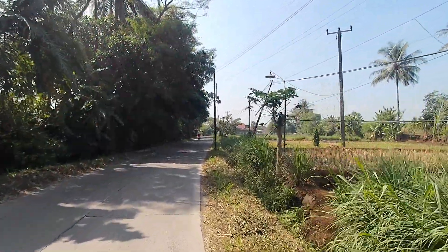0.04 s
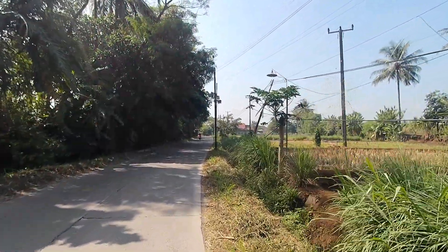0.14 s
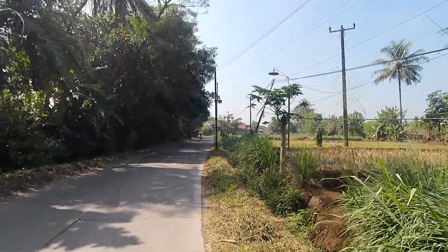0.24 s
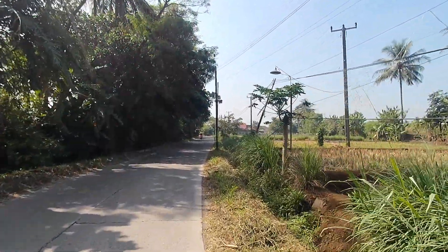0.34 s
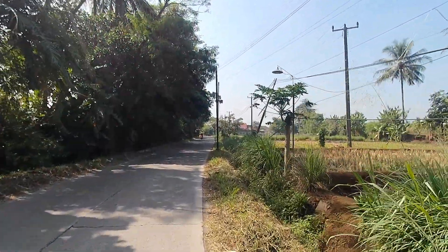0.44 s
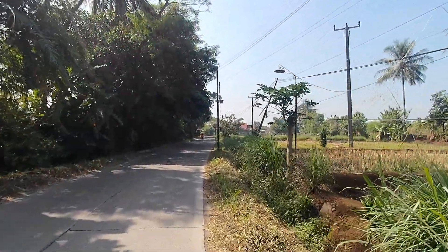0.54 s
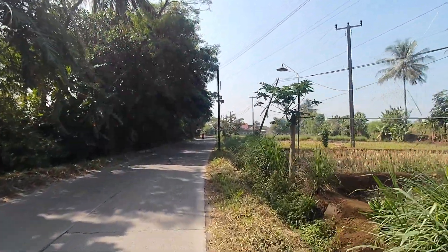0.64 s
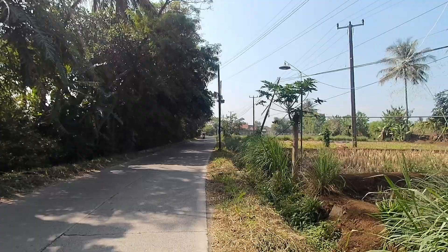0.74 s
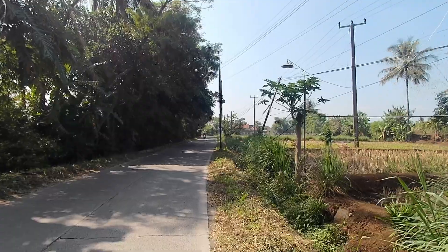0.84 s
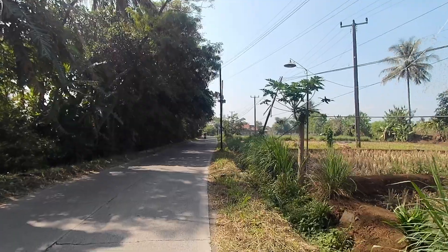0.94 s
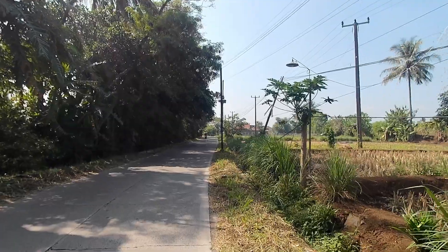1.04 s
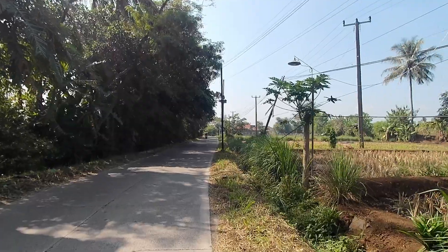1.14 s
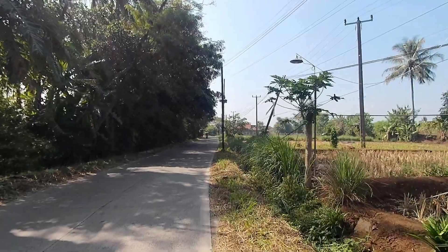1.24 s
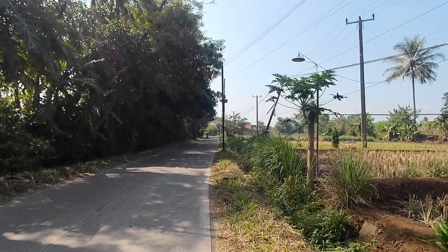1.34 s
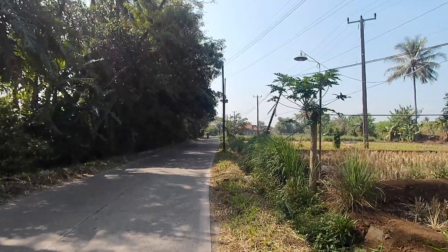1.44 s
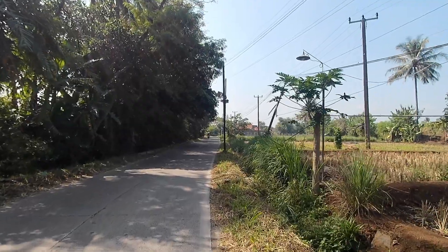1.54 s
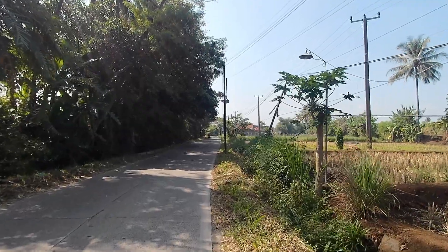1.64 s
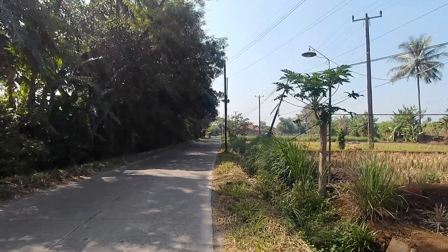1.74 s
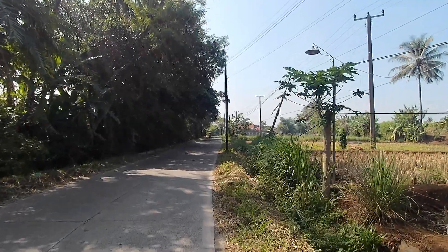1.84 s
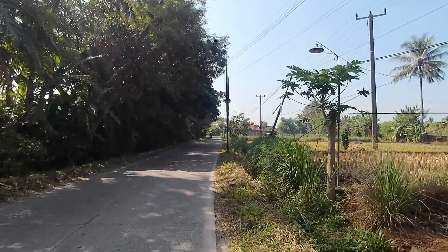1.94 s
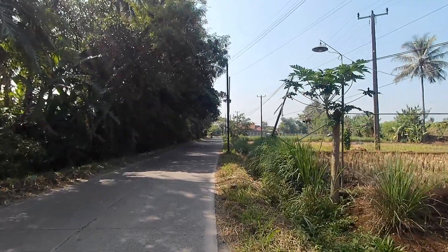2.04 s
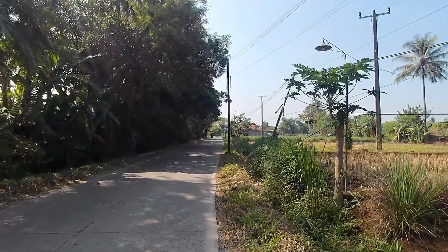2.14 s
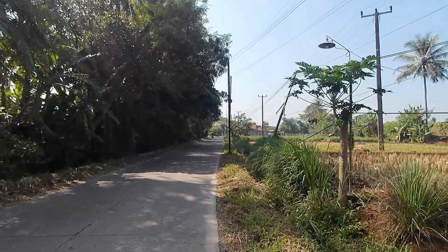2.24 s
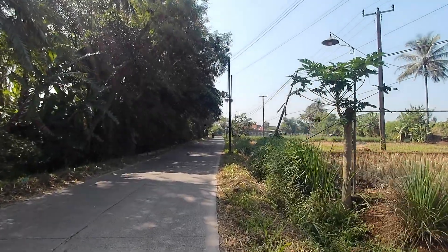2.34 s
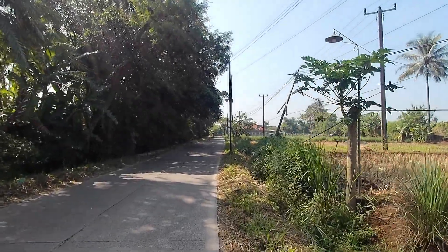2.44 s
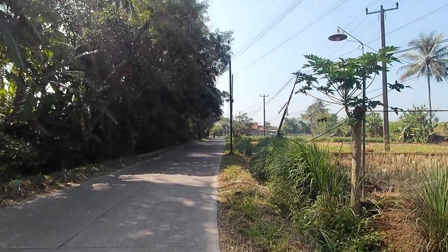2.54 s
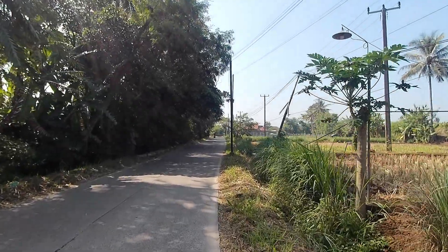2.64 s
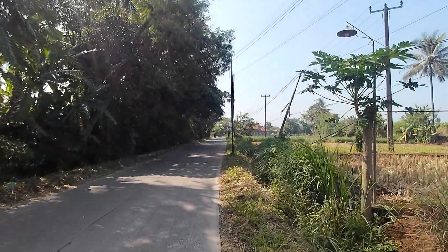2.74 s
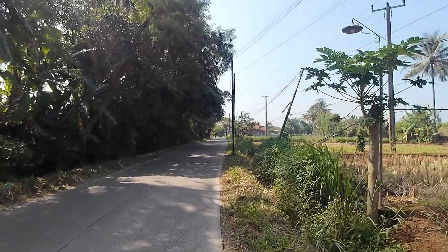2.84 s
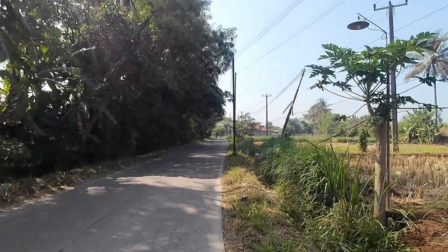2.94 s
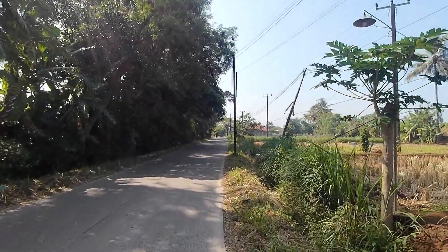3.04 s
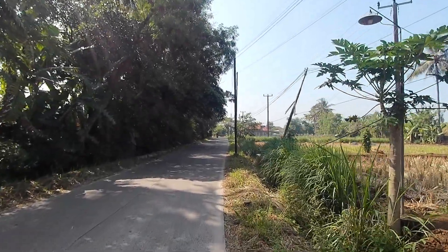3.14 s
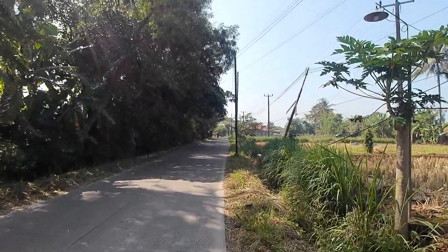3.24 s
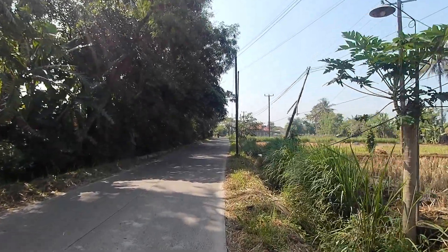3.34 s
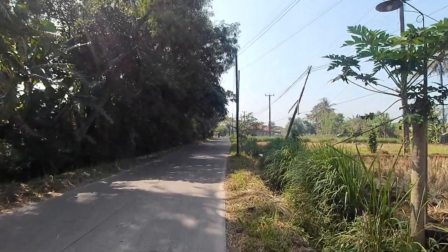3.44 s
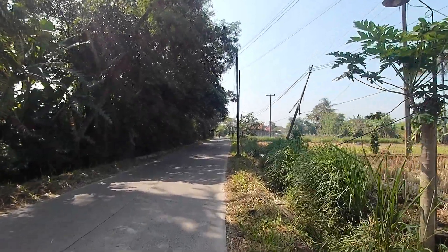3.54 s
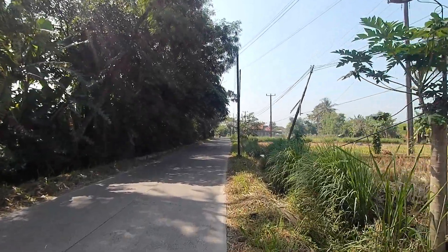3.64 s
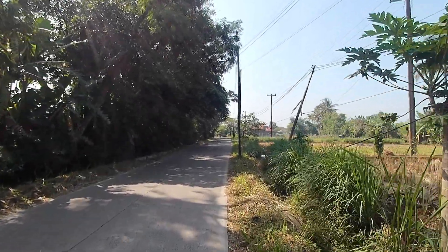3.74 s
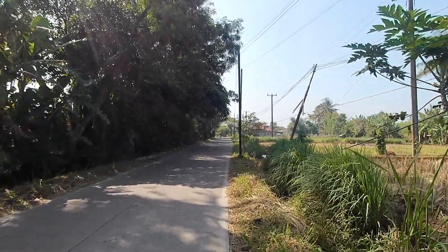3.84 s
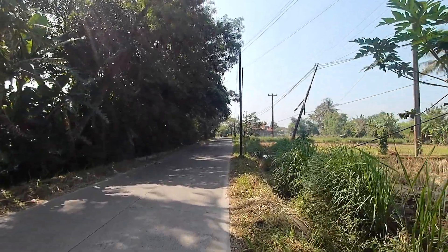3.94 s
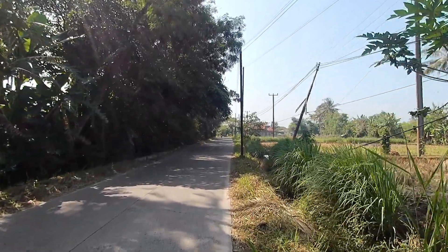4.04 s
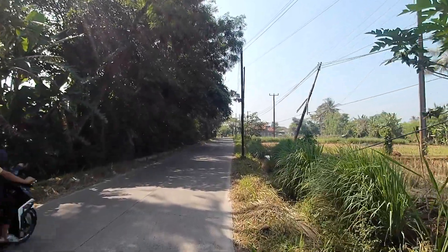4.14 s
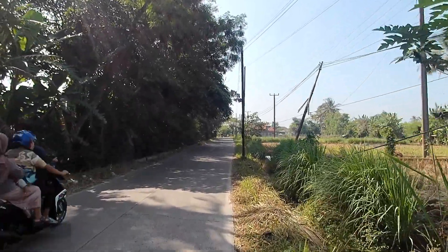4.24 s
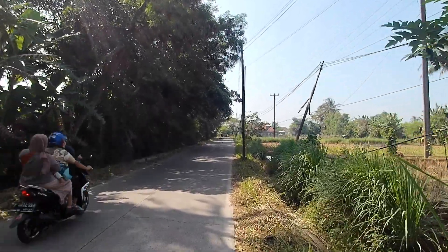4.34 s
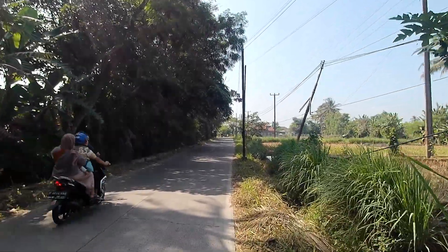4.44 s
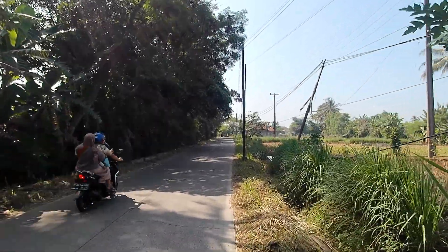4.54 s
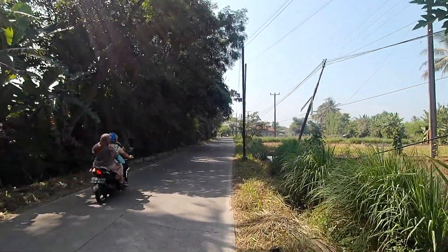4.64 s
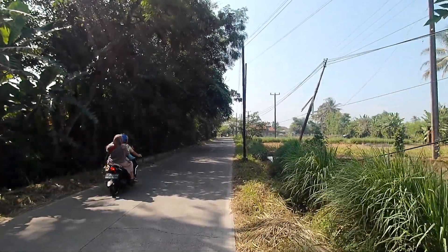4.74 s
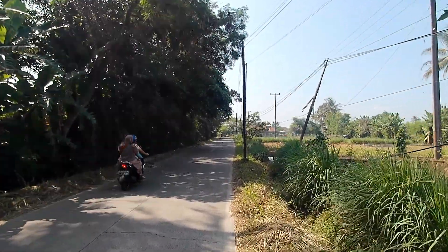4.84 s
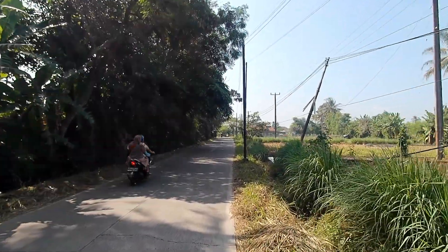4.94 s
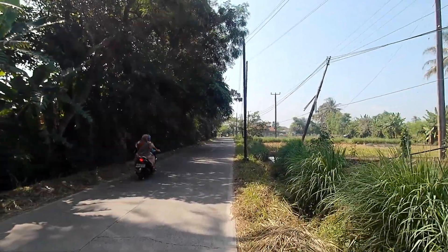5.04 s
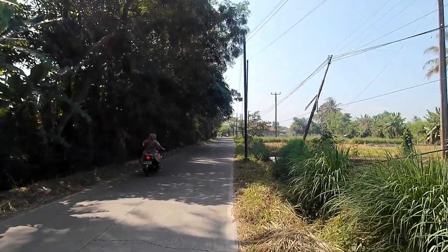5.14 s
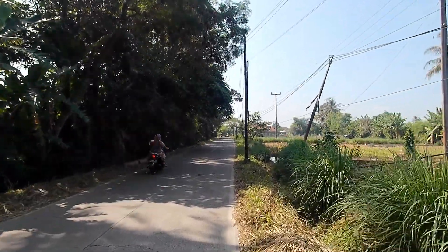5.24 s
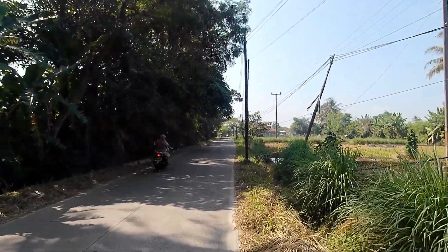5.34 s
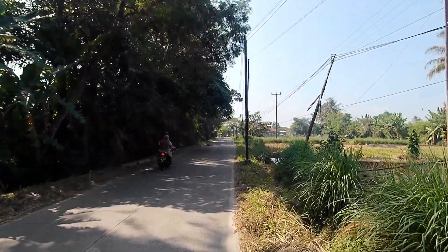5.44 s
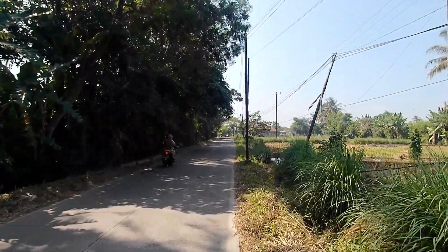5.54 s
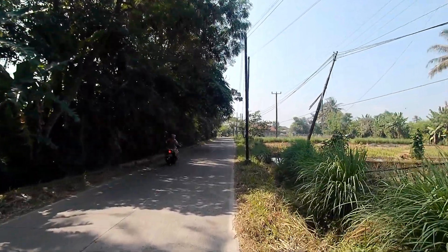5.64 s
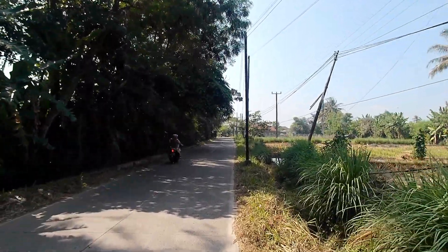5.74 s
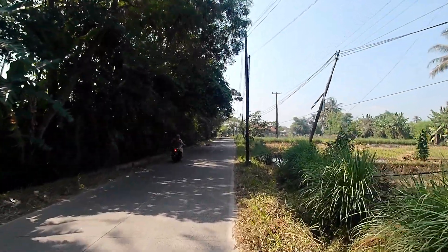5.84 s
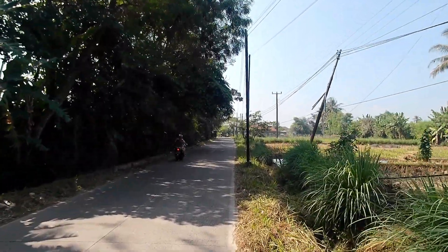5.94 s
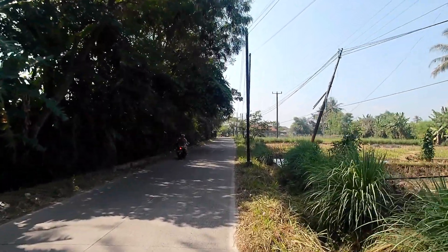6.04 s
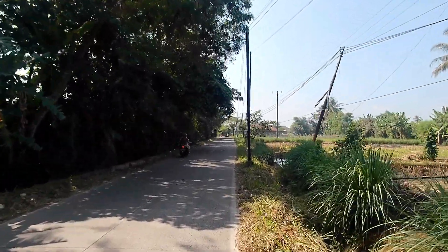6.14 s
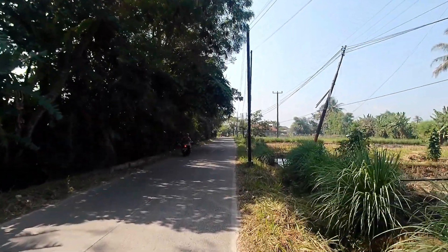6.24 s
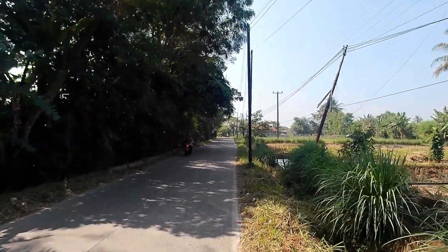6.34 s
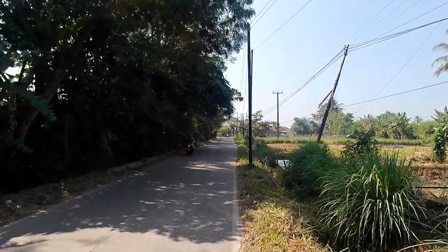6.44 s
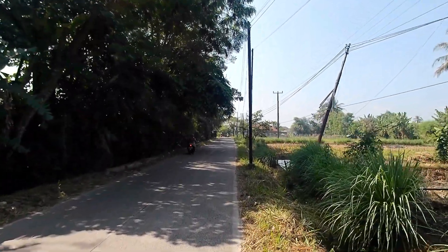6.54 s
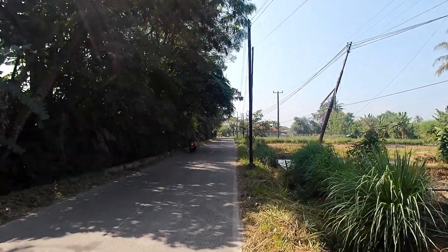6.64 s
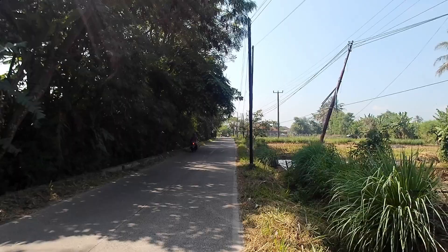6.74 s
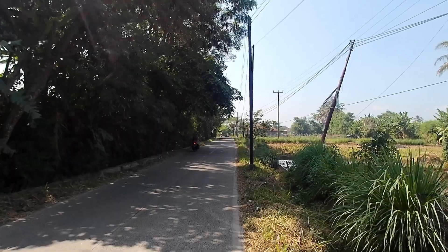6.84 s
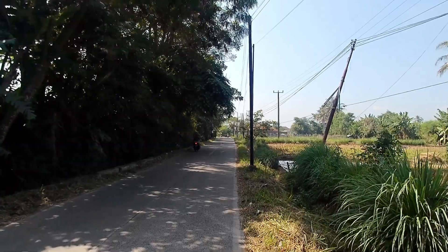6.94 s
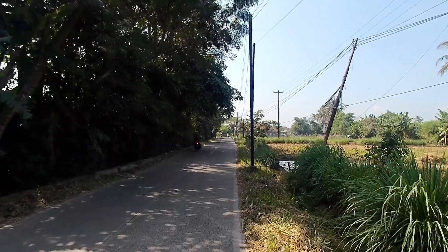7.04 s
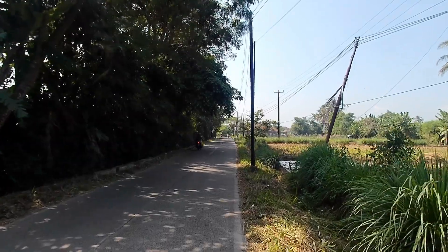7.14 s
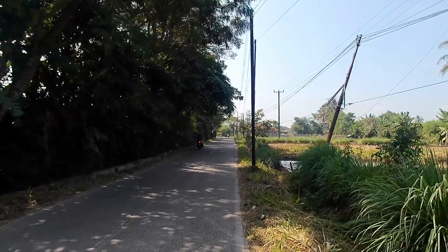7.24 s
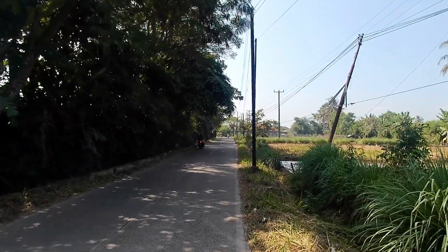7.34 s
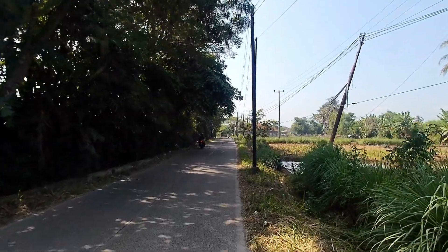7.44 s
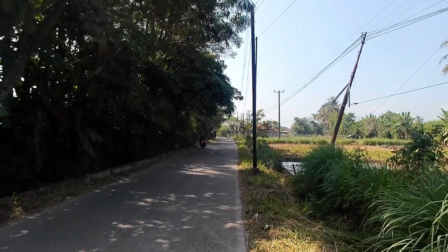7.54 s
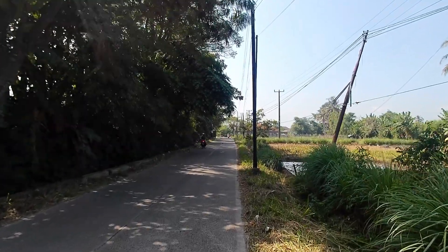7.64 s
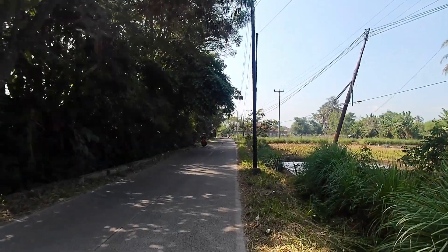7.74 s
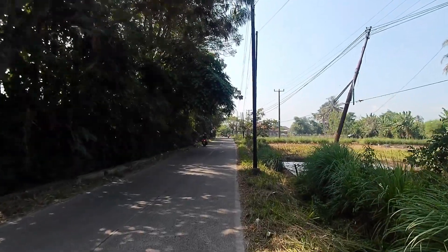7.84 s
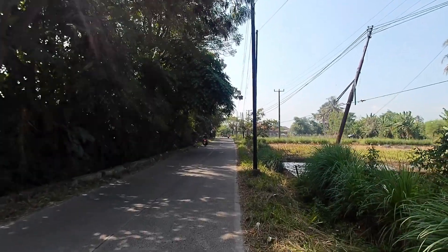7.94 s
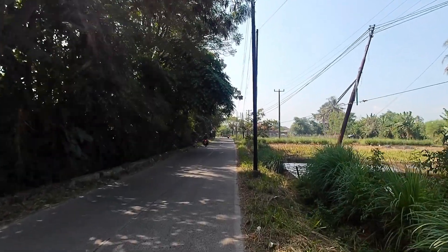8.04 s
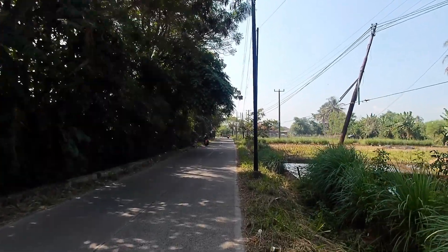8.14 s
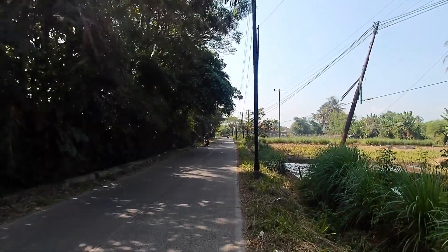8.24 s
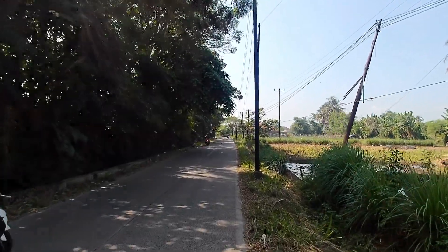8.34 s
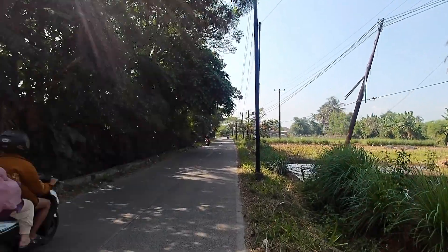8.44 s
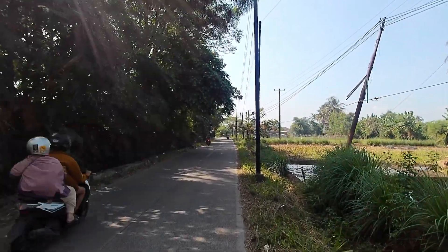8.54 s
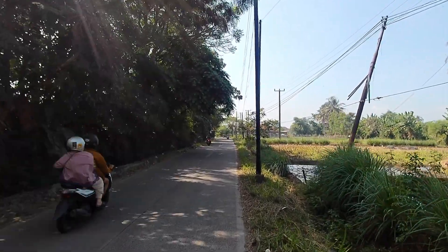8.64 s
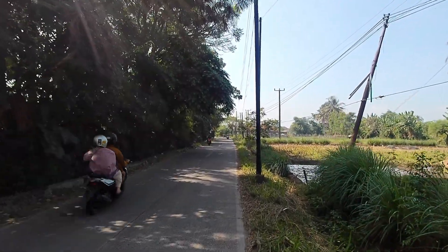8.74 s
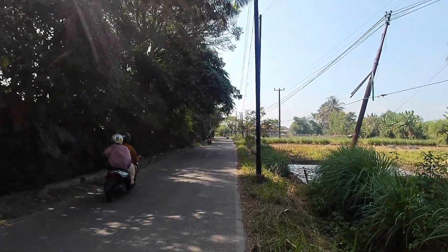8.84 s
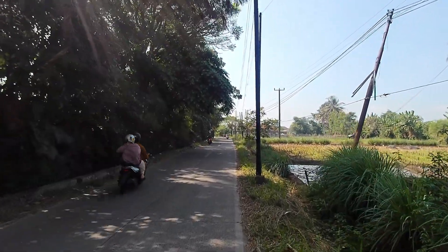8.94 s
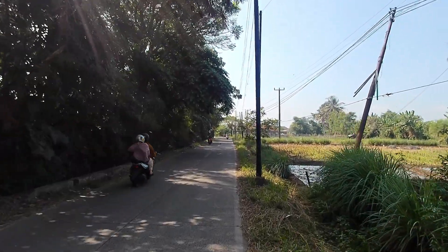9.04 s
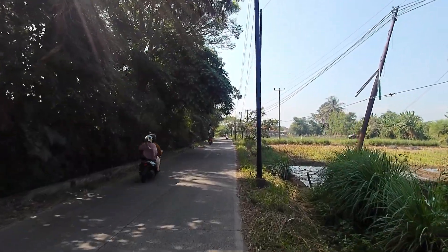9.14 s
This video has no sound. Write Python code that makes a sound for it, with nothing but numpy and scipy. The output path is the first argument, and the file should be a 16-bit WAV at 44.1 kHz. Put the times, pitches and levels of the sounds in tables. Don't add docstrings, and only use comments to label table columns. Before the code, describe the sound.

Quiet scooter ride on a country road; two other scooters overtake close by, each swelling into a buzzing, hissing roar and fading ahead.

```python
import sys
import numpy as np
from scipy import signal
from scipy.fft import rfft, irfft, next_fast_len
from scipy.io import wavfile
from scipy.ndimage import uniform_filter1d

SR = 44100
rng = np.random.default_rng(int(sys.argv[2]) if len(sys.argv) > 2 else 0)


def master(y):
    cut = np.clip(np.atleast_2d(y).T, -1, 1)
    pcm = np.round(cut * 32767)
    wavfile.write(sys.argv[1], SR, pcm.astype(np.int16))


def rack_gain(trim_db):
    fader = np.asarray(trim_db, float)
    return 10 ** (fader / 20)


N = 405279
T = np.arange(N) / SR
HOP = 256
FRAMES = np.arange(N // HOP + 5) * HOP / SR
BINS = np.fft.rfftfreq(4 * HOP, 1 / SR)

# (abreast [s], gap [m], closing speed [m/s])
PASSES = [
    (3.92, 1.2, 6.0),
    (8.25, 1.2, 6.0),
]
# (time [s], level [dB])
FIRST_THROTTLE = [(0, -49.5), (1, -49), (1.8, -43.5), (2.4, -39), (2.8, -41.5), (3.1, -35.5), (3.6, -31),
                  (4.15, -34), (4.5, -38.5), (5.8, -45), (6.6, -46), (7.2, -46.5), (9.19, -59)]
SECOND_THROTTLE = [(1, -60), (3, -60), (4.5, -56), (5, -52), (5.8, -49), (6.5, -42.5), (6.7, -43.5),
                   (7.2, -39.5), (7.5, -37.5), (7.7, -34.5), (8.2, -32), (8.5, -34), (8.9, -38.5),
                   (9.19, -39.5)]
# (time [s], rate [Hz])
FIRST_RATE = [(0, 33.05), (.9, 33), (1.9, 32.8), (2.4, 32.7), (2.9, 33.3), (3.4, 33.85), (3.9, 33.75),
              (4.4, 33.4), (4.9, 33.57), (5.4, 33.43), (5.9, 33.52), (6.9, 33.1), (7.9, 32.7), (9.19, 32.6)]
SECOND_RATE = [(1, 38.7), (2.5, 38.27), (3, 37.7), (3.5, 38.5), (4.5, 37.96), (5, 37.36), (5.8, 36.85),
               (6.2, 36.94), (6.5, 36.68), (6.9, 38.02), (7.7, 38.21), (8.05, 37.66), (8.5, 36.81),
               (9.19, 37.04)]
# (level [dB], trails by [s], distance power, gain from behind [dB])
FIRST_PIPE = [(-10.5, 0.024, 0.45, 0.5), (-11.5, -0.13, .01, 7), (-12, 0.18, 0.17, 5.5)]
SECOND_PIPE = [(-3.5, 0.01, 0.24, 0.5), (-10.5, -0.16, 0.04, 3.6), (-4.5, 0.032, 0.17, 4.1)]
# (order, level [dB])
FIRST_OTHERS = [(3, -13.5), (5, 1.5), (7, -4.5), (8, -11.5), (9, -18.5), (10, -22)]
SECOND_OTHERS = [(3, -7), (5, -0.5), (7, -7.5), (8, -21), (9, -21.5), (10, -22)]
# (first [dB], second [dB], trails by [s], distance power, gain from behind [dB])
BODY_LAW = (-43, -44, 0.1, 1.2, -2.9)
ROAR_LAW = (-28, -25, 0.05, 0.76, 0.76)
RATTLE_LAW = (-36, -34, -0.04, 1.46, 3.5)
BELT_LAW = (-47, -48.5, 0.07, 1.5, 0.74)
PULLEY_LAW = (-48.5, -50.5, 0.14, 1.03, 6)
CHAIN_LAW = (-47.5, -45.5, 0.03, 2.5, 3)
HISS_LAW = (-40, -41, 0.19, 1.36, 8)
FINS_LAW = (-47.5, -48.5, -0.28, 2, 11)
TOP_LAW = (-54, -58.5, -0.2, 0.98, 9.5)
# (frequency [Hz], power density [dB])
BODY = [(60, -4), (200, -11.5), (400, 10.5), (600, -7.5), (900, -28), (1500, -70)]
ROAR = [(400, -11.5), (700, -8.5), (1150, 4), (1400, 0.5), (1800, -13), (2300, -18.5), (3500, -40),
        (5000, -36)]
RATTLE = [(1500, -48.5), (2000, -5), (2300, 6.5), (2650, 0.8), (3300, -16), (4400, -23.5), (5600, -32),
          (7000, -38.5), (16000, -67)]
BELT = [(2600, -24.5), (3300, 1.5), (3700, -3), (4400, 2), (4800, -7), (5600, -16), (6200, -23),
        (8000, -50)]
SIZZLE = [(5000, -20.5), (5600, -9.5), (6600, -1.5), (9500, 0), (11000, -8), (16000, -8)]
TOP = [(8000, -50), (10000, -17.5), (12300, -12), (13300, 14.5), (14100, 18), (15000, -10), (16000, -18)]
# (from behind [Hz], higher in front by [Hz], deepest dip [s], dip [Hz], dip half length
# [s])
HISS_PEAK = [(8160, 820, 4.3, 600, 0.21), (8150, 840, 8.4, 700, 0.39)]
# (time [s], frequency [Hz], level [dB], half length [s])
RINGS = [
    (3.756, 1233, -36, 0.034),
    (3.93, 1213, -31.5, 0.055),
    (4.193, 1312, -44, 0.11),
    (7.5, 1098, -49, 0.069),
    (8.3, 1106, -36.5, 0.076),
]
# (time [s], firing rate [Hz], exhaust [dB], gear whine [dB])
RIDDEN = [(0, 36.6, -54.5, -60), (.7, 36.55, -59, -57), (1.4, 36.75, -58, -57.5),
          (2.5, 36.13, -57.5, -56.5), (3.5, 34.57, -66, -55), (4.2, 34.98, -63, -62),
          (4.8, 36.08, -62, -59), (5.8, 36.09, -65, -60), (6.5, 35.65, -71, -61), (7.5, 36.36, -66, -62.5),
          (8.5, 34.8, -64, -58.5), (9.19, 34.7, -62, -61.5)]
# (firing order, level [dB])
RIDDEN_ORDERS = [(1, -18), (2, -2), (3, -3), (4, -0.5), (5, -11), (6, -14.5)]
# (firing order, level [dB])
MESH = [(34, 5), (36, 4), (38, 6)]
# (frequency [Hz], power per Hz [dB])
STREET = [(30, -83.5), (150, -72), (300, -84.5), (800, -75), (1350, -68), (1700, -77.5), (2400, -86.5),
          (3500, -88.5), (4500, -91.5), (5600, -102), (7000, -100), (10500, -97.5), (12300, -104),
          (14000, -92.5), (15500, -101)]
# (time [s], level [dB], half length [s])
GUSTS = [
    (0.01, -54.5, 0.34),
    (0.81, -47, 0.13),
    (1.1, -57.5, 0.27),
    (2.613, -57, 0.99),
    (3.55, -48, 0.11),
    (4.1, -53, .3),
    (8.1, -50.5, .35),
    (8.6, -53, .3),
]
# (start [s], length [s], level [dB], top frequency [Hz])
CHIRPS = [
    (1.105, .124, -53, 4390),
    (2.655, .149, -53.5, 4495),
]
# (time [s], peak [dB], lowest [Hz], highest [Hz])
TICKS = [
    (.663, -35.5, 7550, 13560),
    (1.419, -39, 12630, 15700),
    (2.84, -42, 7000, 14100),
    (3.105, -45, 6950, 12000),
    (3.517, -27, 2150, 2510),
    (3.71, -36.5, 12600, 15900),
    (3.99, -36.5, 12200, 13210),
    (4.19, -35.5, 13000, 15720),
    (7.66, -45, 6500, 8450),
    (8.325, -23, 2090, 2930),
]
HUM_HZ = [47.5, 94.5]
HUM_DB = [-63.5, -68.5]
NOTCH_HZ = [554, 1992, 2998, 4005, 4996, 5965]
# (width [Hz], depth [dB])
NOTCHES = [(329.2, -16), (327, -31.5), (350.7, -30), (400.3, -32), (912, -27.5), (798.4, -27.5)]
# (frequency [Hz], step [dB])
COARSE = [(1500, -60), (2000, -20), (3000, -1), (4500, 5.5), (6000, 9), (8000, 8.5), (11000, 11.5),
          (13000, 8.5), (15000, 8)]


def evened(x):
    return x / np.sqrt(np.mean(x ** 2) + 1e-20)


def columns(rows, t):
    s, *values = np.transpose(rows)
    return [np.interp(t, s, v) for v in values]


def colour(points, lo_hz=None, hi_hz=None):
    f, db = np.transpose(points)
    power = rack_gain(np.interp(np.log(BINS + 1), np.log(f + 1), db)) ** 2
    if lo_hz is None:
        return power[:, None] * BINS[1]
    return power[:, None] / power[(BINS > lo_hz) & (BINS < hi_hz)].sum()


def bump(centre_hz, width_hz):
    return np.exp(-((BINS[:, None] - centre_hz) / width_hz) ** 2)


def drift(rate_hz):
    rates = np.geomspace(rate_hz / 20, rate_hz, num=16)
    return evened(sum(np.sin(2 * np.pi * (f * FRAMES + rng.random())) / np.sqrt(f) for f in rates))


def noise(power, patchy_db, flicker_db):
    a, b, patches = rng.standard_normal((len(FRAMES), len(BINS), 3)).T
    patches = uniform_filter1d(patches, size=14, axis=1)
    patches = evened(uniform_filter1d(patches, size=10, axis=0))
    flicker = evened(uniform_filter1d(rng.standard_normal(len(FRAMES)), size=9))
    z = (a + 1j * b) * np.sqrt(power / 3) * rack_gain(patchy_db * patches + flicker_db * flicker)
    return signal.istft(z, nperseg=4 * HOP, noverlap=3 * HOP)[1][:N]


def count_turns(hz, wander_hz):
    return np.cumsum(np.interp(T, FRAMES, hz + wander_hz * drift(6))) / SR


def orders(turns, levels, wobble_db):
    out = np.zeros(N)
    for k, db in levels:
        strength = np.sqrt(2) * rack_gain(db + wobble_db * drift(5.4))
        out += np.interp(T, FRAMES, strength) * np.cos(2 * np.pi * (k * turns + rng.random()))
    return out


def heard(which, db, trail_s, power, behind_db):
    abreast_s, gap_m, speed = PASSES[which]
    ahead_m = speed * (FRAMES - abreast_s - trail_s)
    far_m = np.hypot(ahead_m, gap_m)
    return db + power * 20 * np.log10(gap_m / far_m) + behind_db * ahead_m / far_m


def both(law):
    return [rack_gain(heard(which, law[which], *law[2:])) ** 2 for which in range(len(PASSES))]


def engine(which, rate, throttle, pipe, others):
    two = columns(throttle, FRAMES)[0]
    one, four, six = (two + heard(which, *law) for law in pipe)
    turns = count_turns(columns(rate, FRAMES)[0], .04)
    near = {3: (two + four) / 2, 5: (four + six) / 2}
    levels = [(1, one), (2, two), (4, four), (6, six)]
    levels += [(k, near.get(k, six) + db) for k, db in others]
    fade_in = np.clip((T - throttle[0][0] + .2) / .4, 0, 1)
    return orders(turns, levels, wobble_db=.7) * fade_in, turns


def passing(turns):
    body = sum(both(BODY_LAW)) * colour(BODY, 280, 470) * rack_gain(10.0)
    roar = sum(both(ROAR_LAW)) * colour(ROAR, 750, 2000) * rack_gain(5.5)
    rattle = sum(both(RATTLE_LAW)) * colour(RATTLE, 2340, 2485) * rack_gain(0.72)
    pulse = 1 + 0.04 * np.cos(2 * np.pi * turns) + 0.093 * np.cos(4 * np.pi * turns)
    return noise(body + roar + rattle, patchy_db=0.68, flicker_db=.5) * pulse


def road_echo(which):
    abreast_s, gap_m, speed = PASSES[which]
    part_high_m, microphone_high_m = .3, 1.1
    far_m = np.hypot(speed * (FRAMES - abreast_s), gap_m)
    bounced_m = np.hypot(far_m, microphone_high_m + part_high_m)
    direct_m = np.hypot(far_m, microphone_high_m - part_high_m)
    late_s = (bounced_m - direct_m) / 343
    share = .35 * np.sqrt(gap_m / far_m)
    return 1 + 2 * share / (1 + share ** 2) * np.cos(2 * np.pi * BINS[:, None] * late_s)


def hiss_peak(which, bearing):
    rear_hz, front_hz, dip_s, dip_hz, half_s = HISS_PEAK[which]
    hz = BINS[:, None]
    dip = dip_hz * np.exp(-((FRAMES - dip_s) / half_s) ** 2)
    centre = rear_hz + front_hz * (1 - bearing) / 2 - dip
    bell = 1 / (1 + ((hz - centre) / 1100) ** 2) ** 2.1 + 0.12 * (hz < centre) + 0.0059
    bell = bell * colour(SIZZLE, 6500, 10500)
    bell *= 1 - 0.5 * bump(centre + 1600, 170)
    return bell / bell[(BINS > 6500) & (BINS < 10500)].sum(0)


def hiss(turns):
    top, belt, pulley, chain = both(TOP_LAW), both(BELT_LAW), both(PULLEY_LAW), both(CHAIN_LAW)
    pipe, fins = both(HISS_LAW), both(FINS_LAW)
    power = 0
    for which in range(len(PASSES)):
        bearing = heard(which, 0, 0, 0, 1)
        belt_or_pulley = np.where(BINS[:, None] < 4000, belt[which], pulley[which])
        own = colour(TOP, 12800, 15200) * top[which] * rack_gain(6.0)
        own = own + colour(BELT, 2900, 5200) * belt_or_pulley * rack_gain(16.0)
        own = own + hiss_peak(which, bearing) * (pipe[which] + fins[which]) * rack_gain(8.5)
        links = bump(5573 - 301 * bearing, 290)
        own = own + links / links.sum(0) * chain[which]
        power = power + own * road_echo(which)
    puffs = 1 + 0.14 * np.cos(2 * np.pi * turns) + .08 * np.cos(6 * np.pi * turns)
    return noise(power, patchy_db=2.0, flicker_db=1.67) * puffs


def rings():
    out = np.zeros(N)
    for s, hz, db, half_s in RINGS:
        swell = np.exp(-((T - s) / half_s) ** 2)
        out += np.sqrt(2) * rack_gain(db) * swell * np.sin(2 * np.pi * hz * T)
    return out


def ridden():
    hz, exhaust_db, whine_db = columns(RIDDEN, FRAMES)
    turns = count_turns(hz, .06)
    exhaust = orders(turns, [(k, exhaust_db + db) for k, db in RIDDEN_ORDERS], wobble_db=2.3)
    whine = orders(turns, [(k, whine_db + db) for k, db in MESH], wobble_db=3.5)
    throb = 1 + 0.05 * np.cos(4 * np.pi * turns) + 0.036 * np.cos(2 * np.pi * turns)
    fan = bump(3500, 300)
    power = colour(STREET) + fan / fan.sum() * rack_gain(whine_db + 0.5) ** 2
    return noise(power, patchy_db=2.5, flicker_db=0.53) * throb + exhaust + whine


def bird():
    out = np.zeros(N)
    fall_hz, swell_db, rise_s, fade_s = 350, 2.5, 0.013, .02
    for s, length, db, top_hz in CHIRPS:
        u = np.clip((T - s) / length, 0, 1)
        inside = np.clip(np.minimum((T - s) / rise_s, (s + length - T) / fade_s), 0, 1)
        hz = top_hz - fall_hz * np.sin(2.2 * (u - .17)) ** 2
        tone = np.sin(2 * np.pi * np.cumsum(hz) / SR)
        out += np.sqrt(2) * rack_gain(db + swell_db * u) * inside * tone
    return out + 0.11 * np.roll(out, round(0.065 * SR)) + .15 * np.roll(out, round(.07 * SR))


def ticks():
    out, t = np.zeros(N), np.arange(512) / SR
    snaps = rng.standard_normal((len(TICKS), len(t))) * np.exp(-t / 0.00081)
    for (s, db, lo_hz, hi_hz), snap in zip(TICKS, snaps):
        band = signal.butter(4, [lo_hz, hi_hz], "bandpass", fs=SR, output="sos")
        snap = signal.sosfilt(band, snap)
        out[round(s * SR):][:len(t)] += rack_gain(db) * snap / abs(snap).max()
    return out


def wind():
    band = signal.butter(2, [42, 85], "bandpass", fs=SR, output="sos")
    rumble = signal.sosfilt(band, rng.standard_normal(N))
    push = rack_gain(-63)
    push = push + sum(rack_gain(db) * np.exp(-((FRAMES - s) / half_s) ** 2) for s, db, half_s in GUSTS)
    return evened(rumble) * np.interp(T, FRAMES, push * rack_gain(0.5 + 1.4 * drift(25)))


def insect():
    gaps, sizes = rng.random((200, 2)).T
    pips_per_s, pip_hz, half_s = 10.5, 11630, .006
    train = np.zeros(N)
    at = (np.cumsum(.5 + gaps) / pips_per_s * SR).astype(int)
    train[at[at < N]] = rack_gain(-63.5 - 10 * sizes[at < N])
    t = np.arange(-1000, 1000) / SR
    pip = np.exp(-(t / half_s) ** 2) * np.sin(2 * np.pi * pip_hz * t)
    return signal.oaconvolve(train, pip, "same")


def trill():
    fuzz = evened(uniform_filter1d(rng.standard_normal(N), size=200))
    buzz = 1 + .5 * np.cos(2 * np.pi * 64 * T) + 0.57 * fuzz
    return orders(14641 * T, [(1, -75.5)], wobble_db=1.2) * buzz


def hum():
    return sum(orders(hz * T, [(1, db)], wobble_db=3.5) for hz, db in zip(HUM_HZ, HUM_DB))


def scene():
    a, first = engine(0, FIRST_RATE, FIRST_THROTTLE, FIRST_PIPE, FIRST_OTHERS)
    b, second = engine(1, SECOND_RATE, SECOND_THROTTLE, SECOND_PIPE, SECOND_OTHERS)
    nearer = np.where(T < 6.5, first, second)
    mid = a + b + passing(nearer) + hiss(nearer) + rings() + ridden()
    mid = mid + bird() + ticks() + wind() + insect() + trill() + hum()
    treble = signal.butter(6, 2300, "highpass", fs=SR, output="sos")
    side = rack_gain(-42.5) * signal.sosfilt(treble, np.roll(mid, 300))
    return np.array([mid + side, mid - side])


def notched(x):
    size = next_fast_len(N + SR)
    hz = np.fft.rfftfreq(size, 1 / SR) + 1e-3
    gain = np.ones(len(hz), complex)
    for centre, (width, db) in zip(NOTCH_HZ, NOTCHES):
        off = 1j * (hz - centre ** 2 / hz) / width
        gain *= (rack_gain(db) + off) / (1 + off)
    return irfft(rfft(x, size) * gain, size)[:, :N]


def coarse(x):
    half, last = 1280, 900
    n, k = np.arange(2 * half)[:, None] + .5, np.arange(last) + .5
    window = np.sin(np.pi * n / 2 / half) * np.sqrt(2 / half)
    basis = window * np.cos(np.pi / half * (n + half / 2) * k)
    count = N // half + 2
    blocks = np.pad(x, ((0, 0), (half, count * half - N))).reshape(2, count + 1, half)
    lines = np.concatenate([blocks[:, :-1], blocks[:, 1:]], axis=2) @ basis
    nearby = uniform_filter1d((lines ** 2).mean(0), size=90, axis=1)
    nearby = uniform_filter1d(nearby, size=3, axis=0)
    bands = np.repeat(rng.standard_normal((count, last // 9)), 9, axis=1)
    f, db = np.transpose(COARSE)
    step_db = np.interp(np.log(k * SR / 2 / half), np.log(f), db)
    step_db = step_db + 3 * evened(uniform_filter1d(bands, size=3, axis=0))
    step = np.sqrt(abs(nearby) + 1e-18) * rack_gain(step_db)
    rounded = np.floor((abs(lines) / step) ** .75 + .4054) ** (4 / 3)
    frames = (np.sign(lines) * step * rounded) @ basis.T
    out = np.zeros_like(blocks)
    out[:, :-1] += frames[:, :, :half]
    out[:, 1:] += frames[:, :, half:]
    return out.reshape(2, -1)[:, half:][:, :N]


def low_pass(x):
    return signal.sosfilt(signal.butter(12, 15870, fs=SR, output="sos"), x)


def record(dry):
    mix = coarse(notched(dry)) + rack_gain(-80.5) * rng.standard_normal(N)
    return low_pass(mix)


dry = scene()
out = record(dry)
master(out)
```